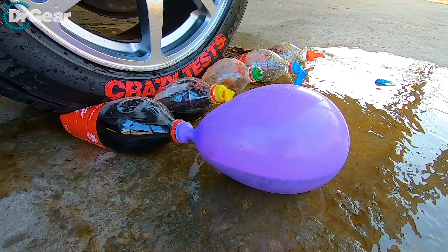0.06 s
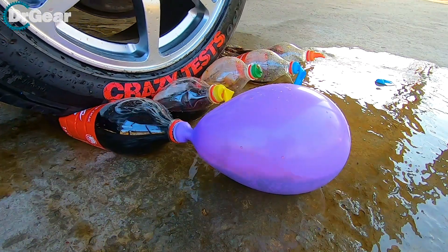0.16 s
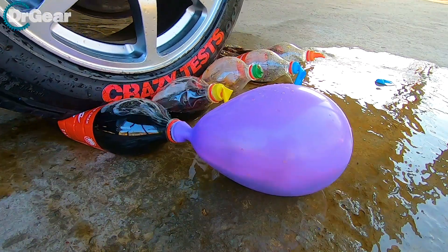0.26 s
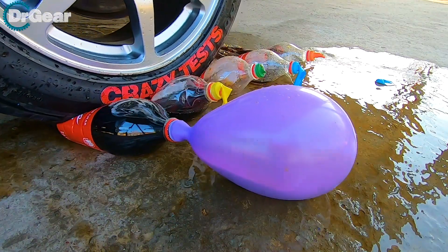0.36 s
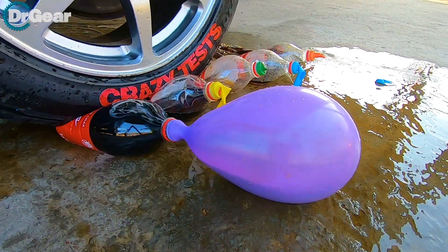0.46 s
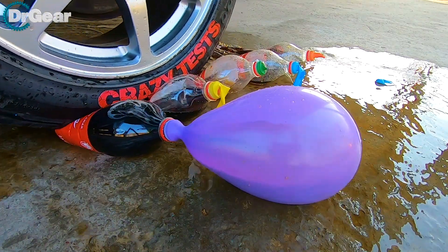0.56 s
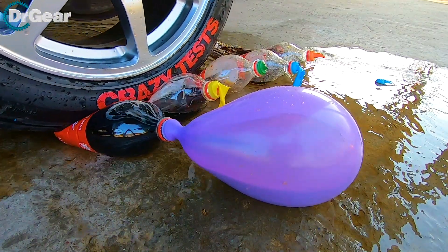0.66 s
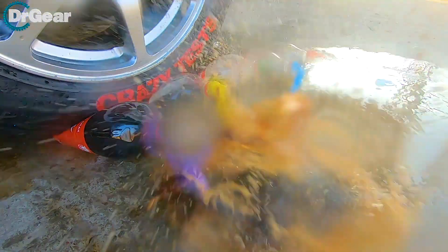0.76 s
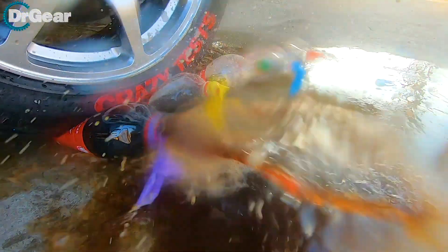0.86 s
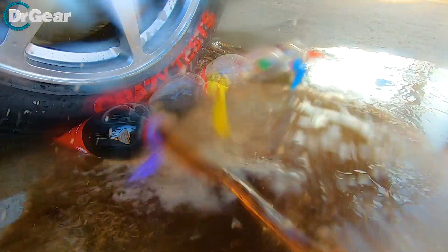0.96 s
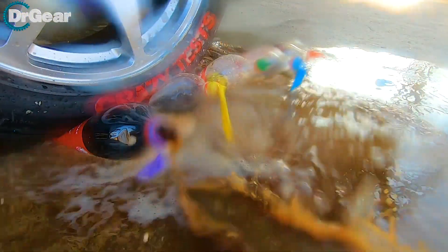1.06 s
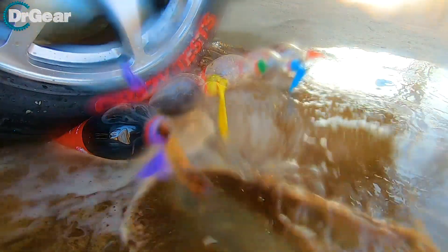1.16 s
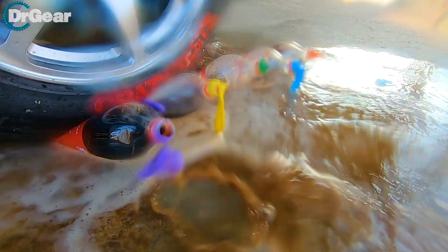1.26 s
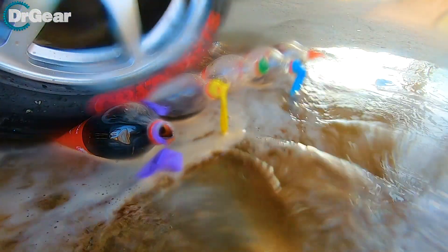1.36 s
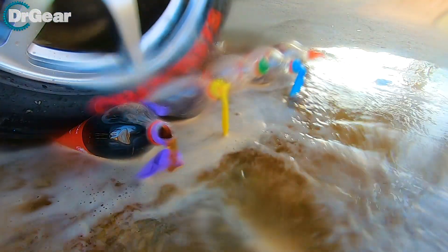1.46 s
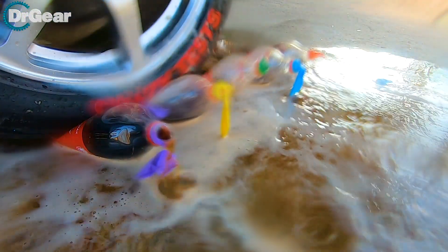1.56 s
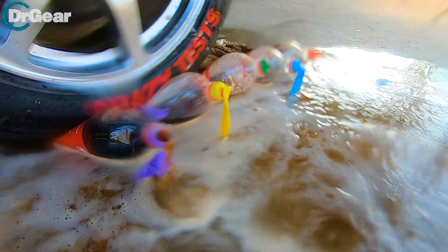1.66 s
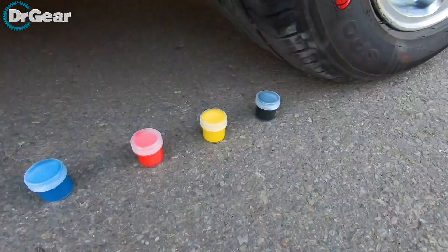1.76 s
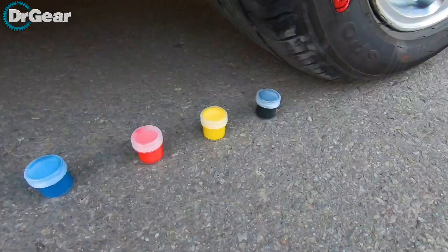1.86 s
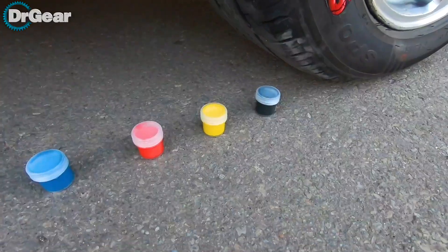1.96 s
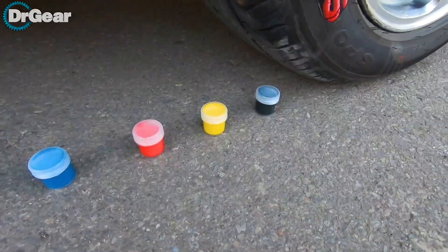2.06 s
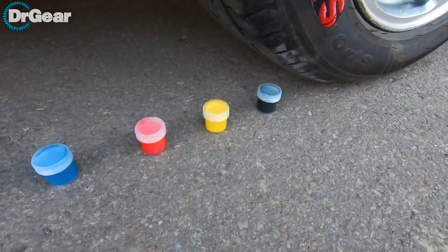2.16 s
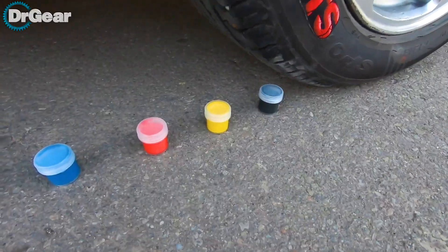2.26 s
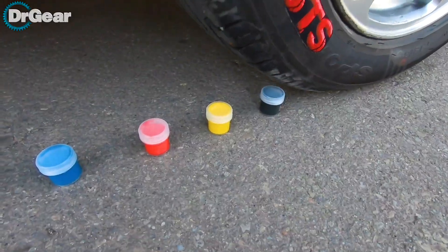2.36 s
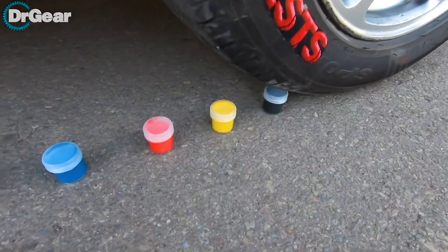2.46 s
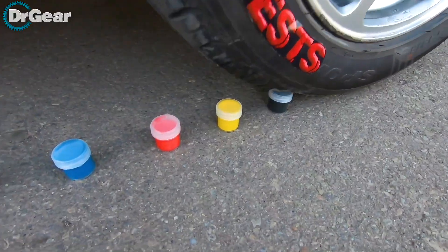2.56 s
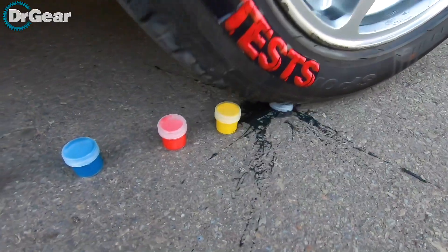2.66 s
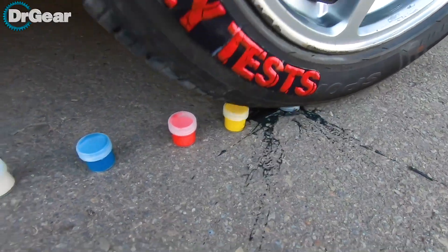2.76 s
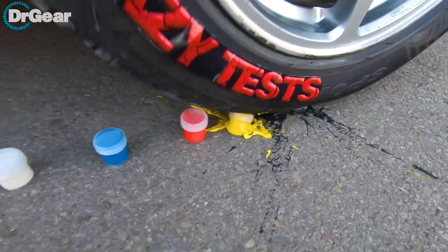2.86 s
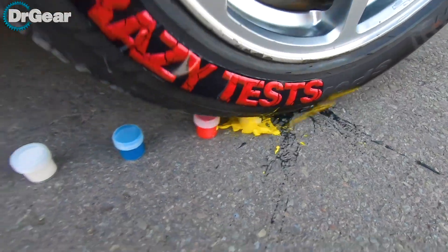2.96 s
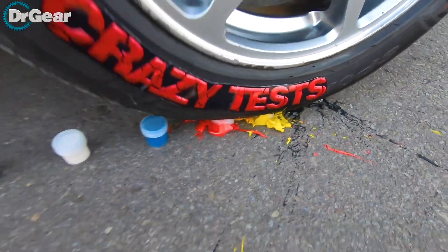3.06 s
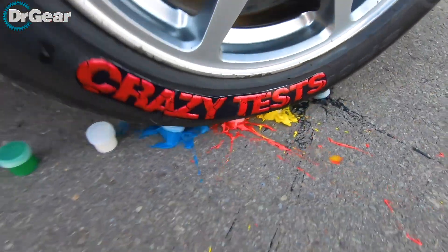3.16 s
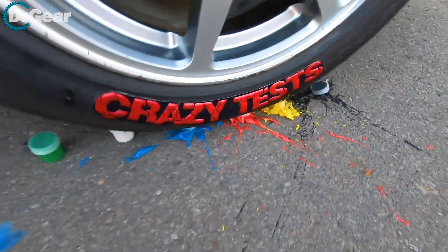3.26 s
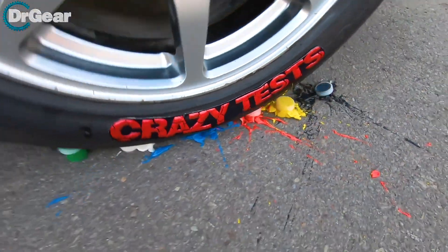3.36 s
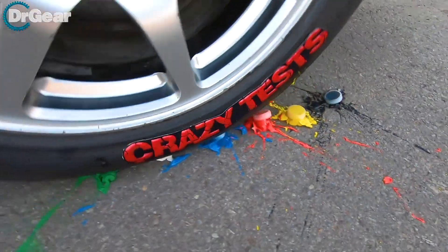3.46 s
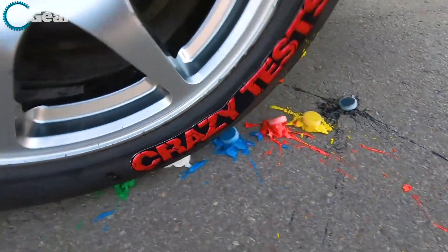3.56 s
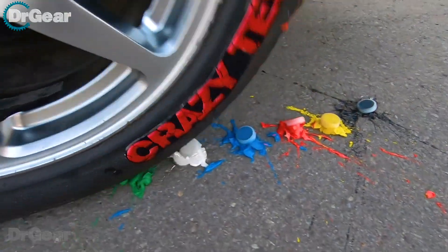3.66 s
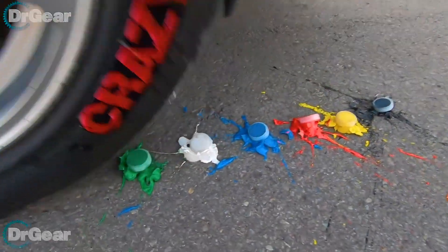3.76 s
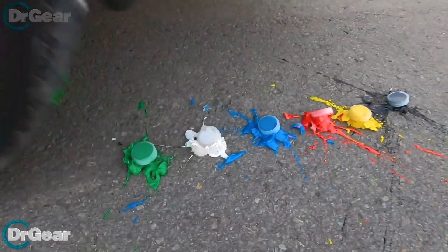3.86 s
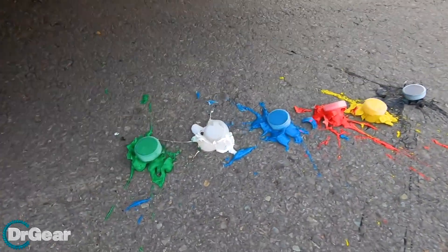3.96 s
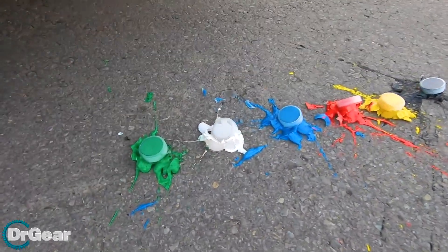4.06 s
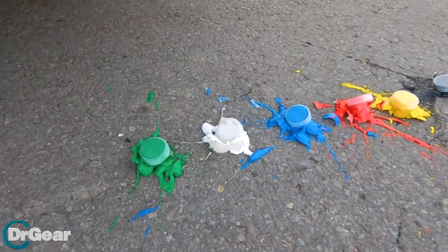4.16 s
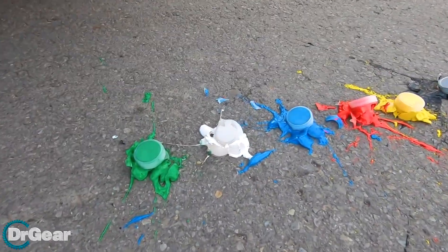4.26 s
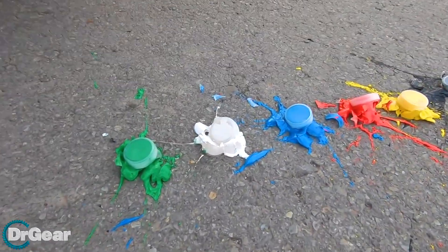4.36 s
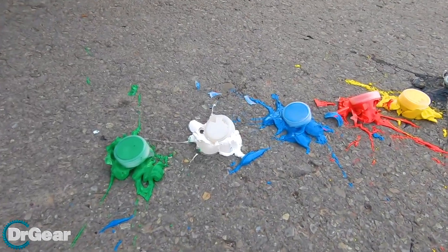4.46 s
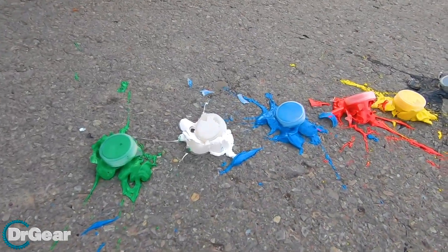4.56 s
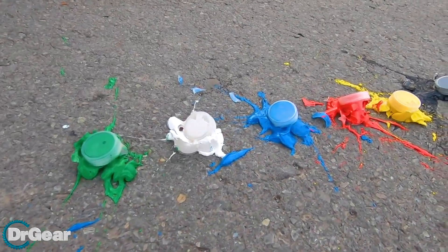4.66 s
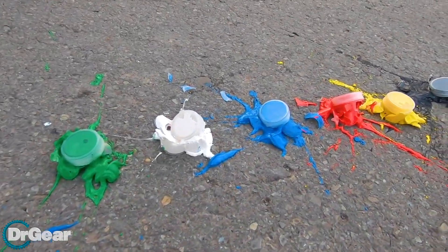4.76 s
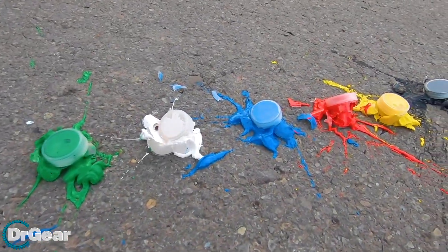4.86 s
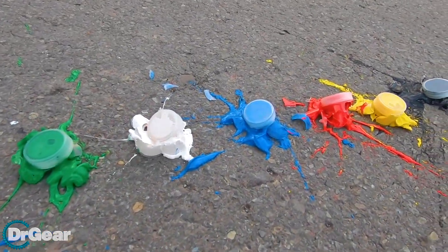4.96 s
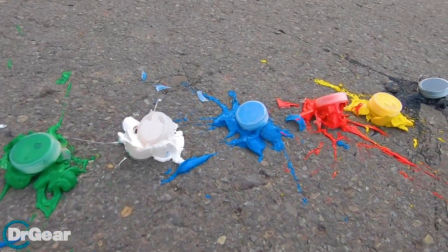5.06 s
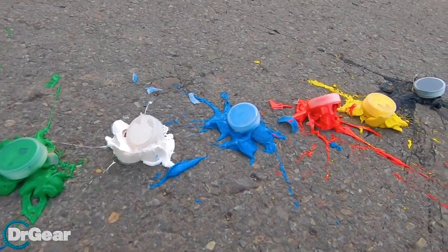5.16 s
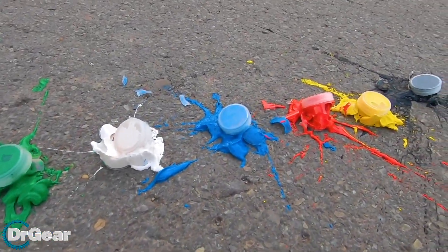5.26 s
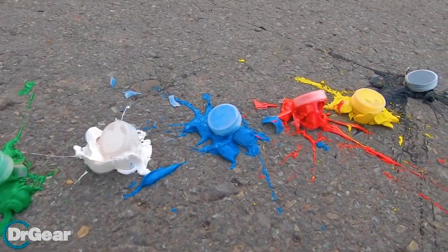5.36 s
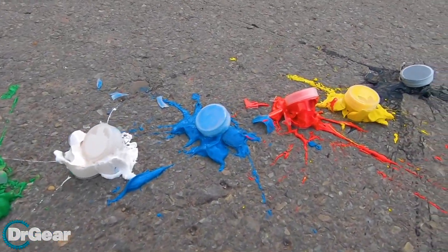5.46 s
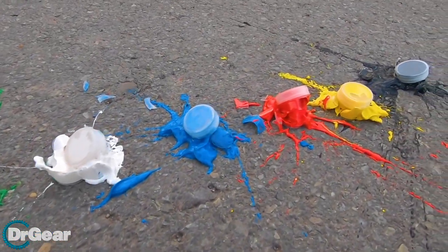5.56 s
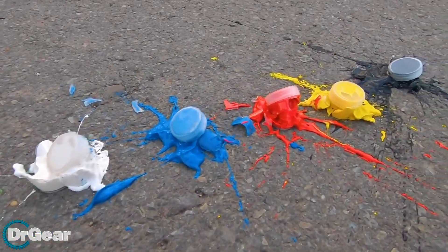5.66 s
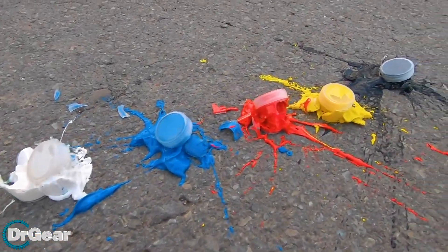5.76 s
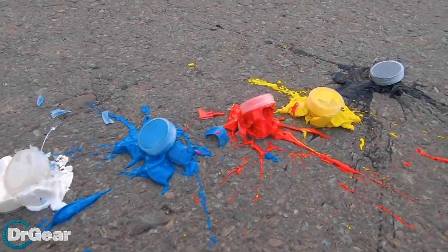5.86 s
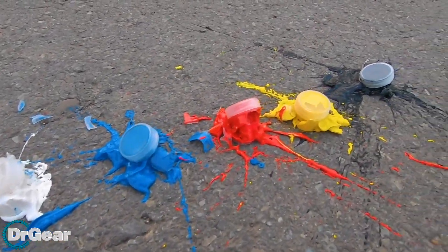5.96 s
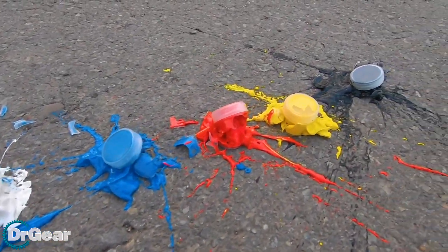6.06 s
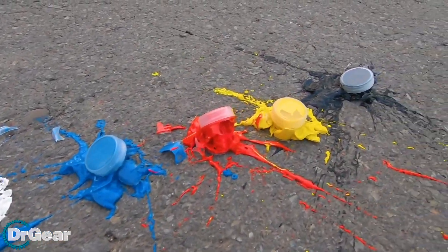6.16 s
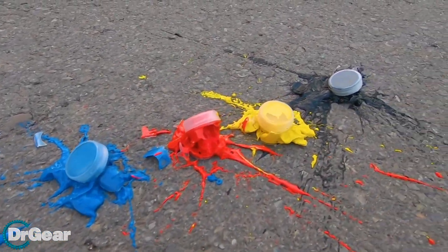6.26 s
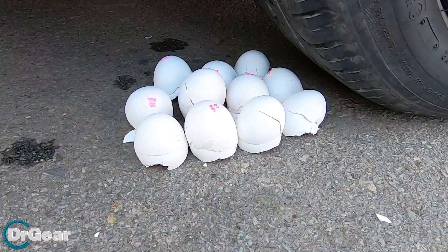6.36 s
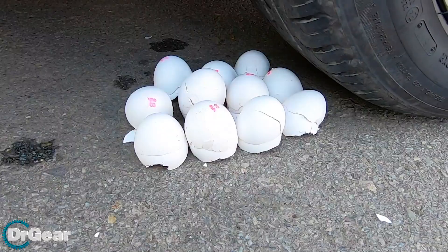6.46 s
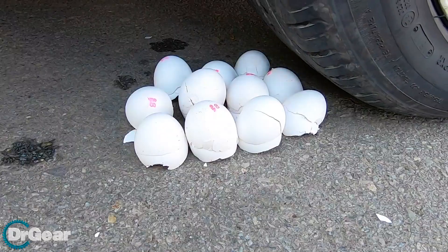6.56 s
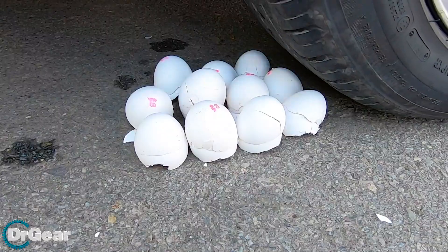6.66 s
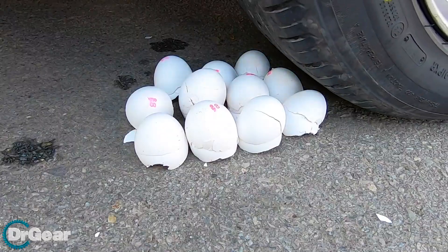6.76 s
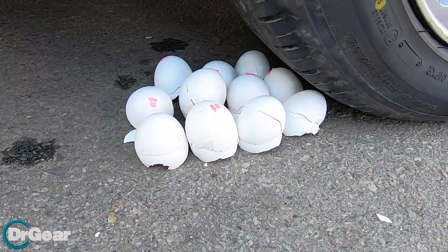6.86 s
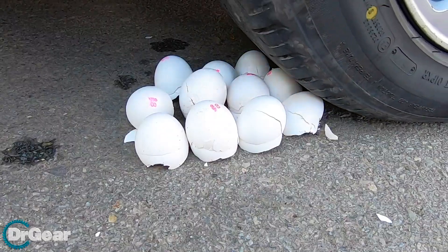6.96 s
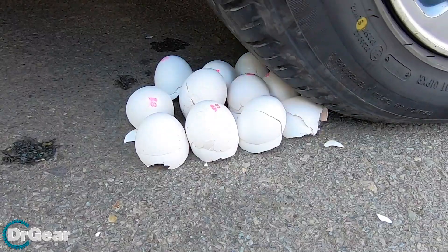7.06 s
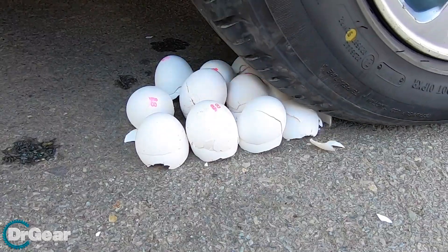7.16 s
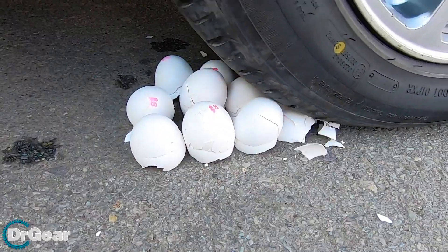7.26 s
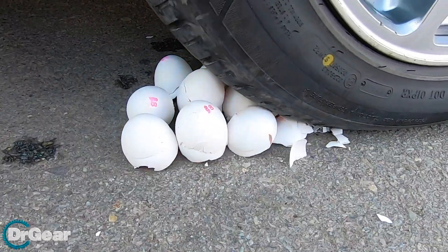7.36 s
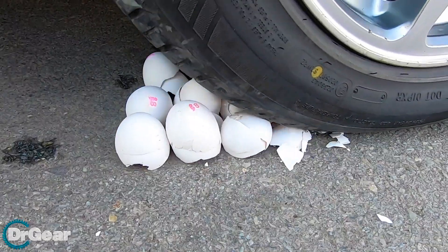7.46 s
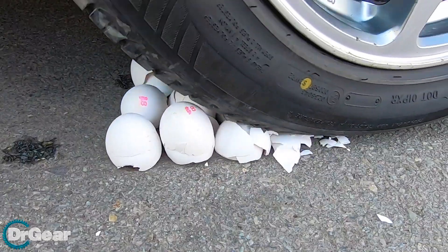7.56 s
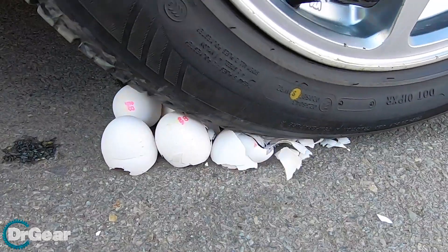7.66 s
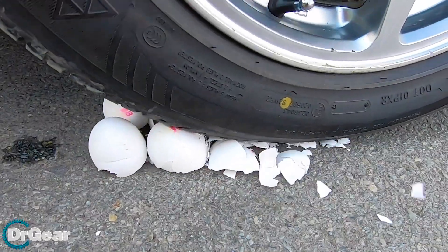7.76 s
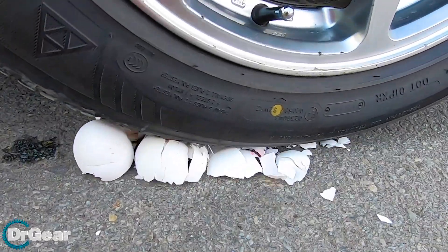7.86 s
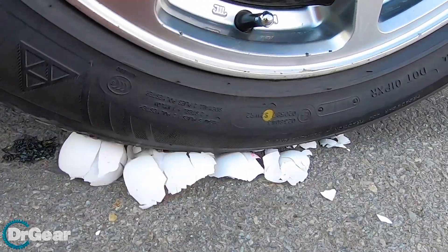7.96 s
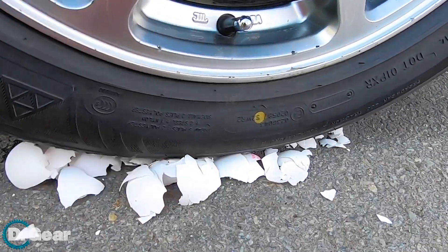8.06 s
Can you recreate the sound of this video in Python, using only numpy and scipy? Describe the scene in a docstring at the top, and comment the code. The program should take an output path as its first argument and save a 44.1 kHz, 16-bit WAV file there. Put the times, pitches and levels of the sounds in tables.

```python
"""A car creeps over things on asphalt, close by, its engine booming below. A plastic bottle buckles and
creaks, gas whistles into the balloon on its neck, and at 0.8 s the balloon bursts and sprays drink.
From 2.7 s paint tubs split and thump the tyre. From 3.8 s the car rolls off: rubber scuffs and squeaks,
grit pops under the tread. From 7 s empty eggshells crunch in a dense run of small fractures."""
import sys
import numpy as np
from scipy import signal
from scipy.fft import rfft, irfft
from scipy.io import wavfile
from scipy.ndimage import uniform_filter1d

SR = 44100
rng = np.random.default_rng(int(sys.argv[2]) if len(sys.argv) > 2 else 0)


def int16_out(signal):
    """Quantize to a 16-bit WAV file."""
    q = np.round(np.clip(np.atleast_2d(signal).T, -1, 1) * 32767)
    wavfile.write(sys.argv[1], SR, q.astype(np.int16))


N = 357651
TIME = np.arange(N) / SR
BURST_S = .7921


def bottle():
    """The wall buckles in steps: two rings, a crack and the hollow body, over a fine crackle."""
    # buckles: t/s, level/dB, low ring f/Hz, sharpness (high ring re low)/dB
    creaks = [(0.158, -28.5, 800, -17.5), (0.213, -23, 473, -12.5), (0.241, -34, 495, -8.5),
              (0.253, -21, 1300, -9.5), (0.267, -26.5, 492, -9), (0.2964, -21.5, 1450, 13.5),
              (0.308, -24, 507, 7), (0.315, -29, 600, 6), (0.334, -30.5, 624, 7.5), (0.341, -28, 1200, 0.5),
              (0.36, -19.5, 1000, -3), (.368, -31.5, 1100, 12), (0.3803, -19, 1000, -9),
              (.386, -27, 900, 7.5), (0.398, -17.5, 900, -9.5), (0.406, -12, 450, -7.5),
              (0.424, -12, 926, -10.5), (0.454, -11.5, 1110, -6), (0.472, -11, 470, -2),
              (0.487, -10, 1850, -2.5), (0.519, -24, 940, -3.5), (0.536, -24, 720, -4),
              (0.548, -26, 1420, 7), (0.577, -24.5, 1150, -7), (0.597, -40, 447, 15),
              (0.647, -17.5, 790, -22), (0.669, -27, 687, -24)]
    # crackle envelope: t/s, level/dB
    creep = [(.1, -76), (.21, -42.5), (.3, -43.5), (.44, -43.5), (.49, -27), (.57, -43), (.66, -51.5)]
    # crackle spectrum: f/Hz, density/dB
    wall = [(200, -3), (400, 0), (1200, -7), (2000, -1), (2900, -9), (4200, -7), (6500, -24.5),
            (9500, -14.5), (15000, -25)]
    wall_hz = 2883
    out = envelope(creep) * crackle(wall, rate_hz=190, scatter_db=2.7, side=.28, pole=.92)
    for s, db, low_hz, sharp_db in creaks:
        high_hz = wall_hz * (1 + .04 * rng.standard_normal())
        low = snap(low_hz, .69 * low_hz, .026) + .5 * ring(2 * low_hz, .005, length_s=.15)
        high = undb(sharp_db) * snap(high_hz, .28 * high_hz, .019)
        crack = undb(-17 + 3.3 * min(sharp_db, 2)) * snap(8000, 9000, .028)
        body = snap(280, 150, .057) + .65 * ring(250 + 15 * rng.standard_normal(), .07, length_s=.15)
        body_db = 10.5 - 41 * s  # stiffens and booms less as pressure builds
        add(out, s, low + high + crack + undb(body_db) * body, db, .83 * rng.standard_normal())
        for late, size, pitch in rng.random((4, 3)):
            slip = snap(wall_hz * (.93 + .14 * pitch), 300, .02, length_s=.03)
            add(out, s - .019 * np.log(late + .051), slip, db - 21 - 8 * size)
    return out


def balloon():
    """The skin tears: two swings of air, a crack, a ringing cavity; the wave sways the microphone."""
    # cavity modes: f/Hz, level/dB, t60/s
    modes = [(240, 6, 0.067), (338, -5, 0.1), (478, -4.5, 0.099), (610, -2.5, 0.11)]
    cavity_s = BURST_S + .0034
    out = np.zeros((2, N))
    add(out, BURST_S, -ring(680, .016), 6)
    add(out, BURST_S + .00287, 1.3 * ring(800, .0098) - ring(330, .0065), -1)
    add(out, cavity_s, snap(900, 700, .081), -8)
    add(out, cavity_s, sum(undb(db) * ring(hz, t60_s) for hz, db, t60_s in modes), -9)
    add(out, BURST_S + .0026, snap(9000, 7000, .015), -4, pan_db=-9)  # crack of the skin
    add(out, BURST_S + .002, snap(3200, 2500, .0084), -9)
    add(out, BURST_S, snap(2200, 3000, .12), -24)
    sway = -ring(11, .4, length_s=.73)[int(.014 * SR):]
    add(out, BURST_S, sway, -4)
    return out


def tubs():
    """Each tub splits with a ring, a crack, a hollow pop and a spit of paint; the tyre drops and rings."""
    # splits: t/s, level/dB, ring f/Hz, relative crack/dB, relative thump/dB
    splits = [(2.734, -4, 700, -5, -12), (2.9465, -12.5, 2650, 8, -5), (2.979, -45, 5600, 5, -1),
              (2.9875, -39, 5600, 5.5, 6.5), (3.0102, -27, 3600, 6.5, -5), (3.0208, -23, 1630, -1, -2),
              (3.0362, -26, 1920, -1.5, -1), (3.0558, -15, 3360, 8, -6), (3.1045, -10, 5100, 5, -5),
              (3.1604, -14.5, 2540, 0, -22), (3.1938, -13.5, 2600, 6, -5.5), (3.2729, -15.5, 2320, 5.5, 3),
              (3.311, -15.5, 2250, 5, -6.5), (3.4023, -15.5, 2470, 3, -1.5), (3.4133, -23, 1544, -4, 0),
              (3.4203, -17, 4030, 1, -14), (3.4383, -16.5, 2140, 2, -20), (3.441, -15.5, 1470, 4.5, -5),
              (3.4522, -19.5, 1700, 4, -8), (3.475, -25.5, 2330, 2, -9), (3.512, -16.5, 1770, 5.5, 0),
              (3.5214, -22, 3200, -4, 2), (3.5305, -20, 2420, 0, -3), (3.5583, -9.5, 4030, -2, -6)]
    # tyre modes: f/Hz, level/dB, t60/s
    tyre_modes = [(110, -9, 0.11), (168.1, -4, 0.12), (228, 2, 0.065), (340, -4, 0.057)]
    out = np.zeros((2, N))
    for s, db, hz, crack_db, thump_db in splits:
        wall = snap(hz, .53 * hz, .0082)
        crack = 1.02 * snap(8500 + 116 * db, 9000, .011) - .34 * click(hz, .0018)  # weaker is duller
        pop = undb(-3 + .61 * thump_db) * snap(760, 809, .027)
        spit = .09 * snap(3000, 3800, .05) + .06 * snap(9500, 6000, .055)
        pan_db = 5.5 * (s - 3.6)  # the tyre rolls from right to centre
        add(out, s, wall + pop + undb(crack_db) * (crack + spit), db, pan_db)
        thump = 0
        for mode_hz, mode_db, t60_s in tyre_modes:
            gain = undb(mode_db + 2 * rng.standard_normal())
            thump += gain * ring(mode_hz * (1 + .06 * rng.standard_normal()), t60_s)
        add(out, s + .0019, thump, db + thump_db, pan_db=-1.5)
        for late, size, pitch in rng.random((5, 3)):
            fleck = snap(1500 * 6 ** pitch, 4000, .0061, length_s=.03)
            add(out, s + .016 * (.5 + late), fleck, db - 26.5 + 6 * size, pan_db=-3)
    return out


def eggshells():
    """Thin shells fracture in swells; each larger crack sheds shards that ring near its pitch."""
    # larger cracks: t/s, level/dB, ring f/Hz
    cracks = [(7.041, -27, 2730), (7.055, -13.5, 1850), (7.075, -15, 1600), (7.091, -21.5, 735),
              (7.092, -13, 1610), (7.099, -11, 1770), (7.104, -16, 1630), (7.109, -15, 1550),
              (7.149, -16.5, 2940), (7.185, -9.5, 1410), (7.221, -14, 1490), (7.237, -12.5, 1440),
              (7.247, -16, 1170), (7.264, -10, 3040), (7.285, -9, 2980), (7.2892, -12, 1690),
              (7.299, -18, 1450), (7.354, -25, 2520), (7.404, -19, 1750), (7.426, -16, 3000),
              (7.475, -12, 3075), (7.49, -20, 3330), (7.501, -18, 2870), (7.511, -15, 1560),
              (7.522, -17, 1210), (7.532, -13, 1480), (7.539, -13.5, 2700), (7.547, -23, 2000),
              (7.574, -13, 2950), (7.6, -13, 680), (7.621, -22, 1500), (7.628, -12.5, 2200),
              (7.692, -21, 1300), (7.712, -23, 1300), (7.725, -19, 1240), (7.741, -16, 1290),
              (7.758, -19, 1440), (7.774, -11, 5750), (7.785, -17, 4300), (7.807, -23, 1830),
              (7.828, -21, 2320), (7.851, -19, 1340), (7.876, -14, 2930), (7.897, -18, 2980),
              (7.915, -15, 2800), (7.956, -14, 820), (7.992, -17, 1990), (8.002, -17, 2800),
              (8.034, -14.5, 1770), (8.074, -13, 1385)]
    # crackle envelope: t/s, level/dB
    crunch = [(7.04, -48), (7.06, -33.5), (7.1, -26.5), (7.15, -31.5), (7.28, -29.5), (7.34, -33),
              (7.46, -25.5), (7.49, -24.5), (7.545, -27), (7.565, -28), (7.69, -29), (7.76, -25),
              (8.11, -26)]
    # crackle spectrum: f/Hz, density/dB
    spectrum = [(180, -31), (300, -12), (405, -50), (634, -7), (814, -6.5), (2610, -6), (3640, -10.5),
                (5700, -9.5), (8360, -18.5), (9880, -11), (13000, -24.5), (16500, -15)]
    onset_s, shards_s, end_s = crunch[0][0], crunch[1][0], TIME[-1]
    crunch_db = curves(crunch)[0] + 1.1 * walk(25)
    fractures = crackle(spectrum, rate_hz=400, scatter_db=2.8, side=.37, pole=.94)
    out = (TIME > onset_s) * undb(crunch_db) * fractures
    for s, db, hz in cracks:
        shell = snap(hz, .38 * hz, .012) + .38 * click(hz, .0053)
        edge = .55 * snap(5100, 5210, .019) + .19 * snap(9500, 2000, .015)
        add(out, s, shell + edge, db, 2 * rng.standard_normal())
        for late, size, pitch in rng.random((5, 3)):
            shard_hz = hz * (.8 + .4 * pitch)
            shard = snap(shard_hz, .16 * shard_hz, .02, length_s=.04)
            add(out, np.clip(s + .022 * (2 * late - .6), shards_s, end_s), shard, db - 10.5 - 9 * size)
    for when, size, pitch, place in rng.random((220, 4)):
        s = shards_s + when * (end_s - shards_s)
        splinter_db = np.interp(s, TIME, crunch_db) + 9.5 - 3.5 * np.log(size + .06)
        add(out, s, click(1300 * 4.5 ** pitch, .0022), splinter_db, 6 * (place - .5))
    return out


def spray():
    """Spilt drink fizzes; drops land as broad splats."""
    # fizz envelope: t/s, level/dB
    fizz = [(.9, -71), (1.1, -67), (1.5, -63.5), (1.72, -59), (1.95, -66)]
    # splats: t/s, level/dB, centre f/Hz, t60/s
    drops = [(0.808, -23, 4770, 0.024), (0.824, -29, 2200, 0.02), (0.8524, -14, 2670, 0.0026),
             (0.851, -26, 1710, 0.14), (0.852, -19, 900, 0.0068), (0.96, -43, 1142, 0.051),
             (.975, -43.5, 1500, 0.046), (.989, -48, 2490, 0.027), (1.07, -54, 5000, 0.11),
             (1.125, -47, 2920, 0.061), (1.488, -45.5, 3984, 0.4)]
    out = envelope(fizz) * undb(1.4 * walk(34.6))
    out = out * colour(wide(.077), [(2500, -2), (5000, -3.5), (10000, -4), (15500, -3)])
    for s, db, hz, t60_s in drops:
        add(out, s, snap(hz, .79 * hz, t60_s, length_s=.3), db, 2.7 * rng.standard_normal())
    return out


def gas_leak():
    """Gas whistles into the balloon: a narrow, falling band of noise."""
    # whistle: t/s, level/dB, f/Hz
    leak = [(.64, -44.5, 3300), (.69, -46.5, 3170), (.76, -46, 2870), (.785, -56, 2800)]
    _, hz = curves(leak)
    return envelope(leak) * smooth_noise(N, 50) * np.sin(2 * np.pi * np.cumsum(hz) / SR)


def grit():
    """Small things tick and grains pop under the rolling tread."""
    # ringing ticks: t/s, level/dB, f/Hz, t60/s
    ticks = [(1.195, -30.5, 840, 0.045), (1.209, -36.5, 548, 0.29), (1.698, -39, 3300, 0.026),
             (1.736, -36, 3200, 0.015), (1.758, -41, 3300, .02), (1.78, -24.5, 3460, 0.016),
             (1.784, -35, 4250, 0.013), (1.792, -34, 3400, 0.025), (2.714, -28.5, 775, 0.079),
             (2.721, -21.5, 905, 0.018), (3.639, -33.5, 8700, 0.021), (3.639, -33, 2520, 0.032),
             (3.811, -37, 9370, 0.033), (4.527, -46, 2920, 0.017), (4.56, -57, 9500, 0.095),
             (4.612, -51, 10090, 0.038), (4.725, -46.5, 9840, 0.061), (4.883, -41, 10400, 0.072)]
    # clearest grains: t/s
    pops_s = [4.296, 4.612, 4.725, 4.77, 4.885, 4.9, 5.075, 5.223, 5.25]
    out = np.zeros((2, N))
    for s, db, hz, t60_s in ticks:
        add(out, s, snap(hz, 340 + .17 * hz, t60_s, length_s=.3), db, 2.7 * rng.standard_normal())
    for when, size, pitch in rng.random((400, 3)):
        grain = snap(1700 * 2.2 ** pitch, 1800, .012, length_s=.02)
        add(out, 3.6 + 2.6 * when, grain, -69 - 5.5 * np.log(size + .075) - 7 * when)
    for s in pops_s:
        add(out, s, snap(2500, 2600, .018, length_s=.02), -52 + 2 * rng.standard_normal())
    return out


def rubber():
    """The tyre scuffs and squeaks thinly as the car pulls away."""
    # scuff envelope: t/s, level/dB
    scuff = [(3.78, -62), (3.84, -49.5), (4.18, -51), (4.23, -68)]
    # squeaks: t/s, length/s, level/dB, f/Hz
    squeaks = [(4.12, 0.054, -59, 1500), (4.3, 0.054, -62, 1360), (4.875, .04, -61, 1370),
               (5.054, .085, -58.5, 1366), (5.109, .045, -70, 4270), (5.427, .04, -73, 3950)]
    spectrum = [(550, -14.5), (750, 3), (1100, 4), (1250, -16.5), (1500, -11.5), (1700, -29.5)]
    out = envelope(scuff) * undb(5 * walk(30)) * colour(wide(.4), spectrum)
    for s, length_s, db, hz in squeaks:
        t = np.arange(int(length_s * SR)) / SR
        phase = 2 * np.pi * hz * np.cumsum(1 + .03 * smooth_noise(len(t), 150)) / SR
        add(out, s, np.sqrt(np.sin(np.pi * t / length_s)) * np.sin(phase), db)
    return out


def knocks():
    """Two dull knocks on the microphone's housing."""
    # knocks: t/s, level/dB, f/Hz, t60/s
    thuds = [(5.807, -25.5, 75, 0.13), (6.359, -35, 16, 0.45)]
    out = np.zeros((2, N))
    for s, db, hz, t60_s in thuds:
        add(out, s, ring(hz, t60_s, length_s=.6), db)
    return out


def engine():
    """A wavering firing tone; its overtones boom where they pass the exhaust resonance."""
    # one table per stretch: t/s, firing f/Hz, tone/dB, boom/dB
    stretches = [
        [(0, 50.6, -39, -42.5), (.2, 44.93, -43, -34.5), (.7, 30, -31.5, -64), (1.01, 22.46, -40, -76),
         (1.2, 24.57, -39, -61.5), (1.44, 26.78, -36.5, -47.5), (1.8, 26.96, -34.5, -39),
         (1.97, 27.05, -54, -51)],
        [(1.7, 56.8, -51, -57), (1.73, 57.3, -50, -31.5), (1.83, 58.46, -37, -22.5), (1.9, 60.6, -30.5, -26),
         (2.15, 60.36, -31, -30), (2.47, 56.03, -28, -19.5), (2.72, 49.94, -30, -25.5), (2.76, 49.2, -49, -45)],
        [(2.76, 47.7, -45, -43.5), (3.11, 42.63, -56, -29), (3.81, 38.3, -45.5, -26), (4.0, 39.24, -43, -24.5),
         (4.17, 42.54, -38.5, -25), (4.26, 43.55, -36.5, -39.5), (4.36, 42.5, -34, -33),
         (4.45, 41.95, -35.5, -38.5), (4.52, 40.9, -36, -31.5), (4.63, 40.67, -37, -32),
         (4.9, 35.5, -35, -39.5), (4.96, 35.26, -36, -39.5), (5.2, 31.54, -33, -50.5), (5.74, 26, -43.5, -47),
         (6.3, 27.2, -39.5, -45)],
        [(6.3, 26.94, -33, -42), (6.42, 28.2, -38.5, -34), (6.52, 28.7, -36, -29), (7.14, 32.7, -34, -31.5),
         (7.4, 34.77, -38, -38.5), (8.11, 34.62, -35.5, -41)],
    ]
    # one row per stretch: weight/dB of multiples 2 to 8 of the firing rate
    overtones = [
        [-1.5, -4, -5.5, 3, -6, -3, -10.5],
        [-39.5, 4.5, -25, -13, -17.5, -28, -30],
        [-0.5, -8, 2, -9.5, -10, -5.5, -20],
        [1, 7, -1.5, 1.5, -5.5, -15, -20.5],
    ]
    # boom per stretch: left minus right/dB
    pans_db = [0, -0.53, -.25, -1.4]
    exhaust_hz, exhaust_width_hz = 154, 23
    out = np.zeros((2, N))
    for table, weights_db, pan_db in zip(stretches, overtones, pans_db):
        hz, tone_db, boom_db = curves(table)
        phase = 2 * np.pi * np.cumsum(hz * (1 + .007 * walk(14) + .006 * walk(25))) / SR
        boom, power = 0, 0
        for k, db in enumerate(weights_db, start=2):
            resonance = .15 + 1 / (1 + ((k * hz - exhaust_hz) * 2 / exhaust_width_hz) ** 2)
            gain = resonance * undb(db + 2.2 * walk(8) + .5 * k * walk(30))  # higher ones flutter more
            boom += gain * np.sin(k * phase + rng.uniform(0, 2 * np.pi))
            power += gain ** 2
        boom *= undb(boom_db + 1.7 * walk(22)) / np.sqrt(power)
        out += np.sqrt(2) * during(table) * (undb(tone_db) * np.sin(phase) + pan(pan_db) * boom)
    return out


def tyre_hum():
    """The air in the loaded tyre hums at its cavity resonance."""
    # one envelope per hum: t/s, level/dB
    hums = [
        [(2.74, -35), (2.81, -31), (2.96, -32)],
        [(7.14, -75), (7.22, -34.5), (7.7, -56.5), (8.11, -47)],
    ]
    cavity_hz = 231
    level = sum(envelope(table) * undb(3.1 * walk(28)) for table in hums)
    return np.sqrt(2) * level * np.sin(2 * np.pi * cavity_hz * TIME)


def road_roar():
    """Engine bay and road roar over a low rumble; both flicker a little."""
    # one envelope per stretch: t/s, level/dB
    stretches = [
        [(0, -47.5), (.12, -47), (.3, -38.5), (.5, -41.5), (.75, -46.5), (1.05, -64.5), (1.72, -54.5)],
        [(1.72, -54), (1.79, -46.5), (1.87, -36), (2.0, -33.5), (2.4, -33.5), (2.75, -41.5)],
        [(2.75, -53.5), (3.1, -48), (3.5, -44.5), (3.72, -55.5), (6.27, -62)],
        [(6.27, -54.5), (6.33, -50), (6.4, -42), (7.03, -43.5)],
    ]
    # one roar spectrum per stretch: f/Hz, density/dB
    spectra = [
        [(260, -33), (450, -3.5), (523, -4), (1090, -9), (1360, -7), (1630, -15), (7360, -33), (16000, -32.5)],
        [(260, -43), (450, -12), (644, -4), (1220, -10), (2870, -21.5), (6630, -45.5), (9630, -39.5),
         (13600, -54), (16000, -93)],
        [(260, -32.5), (450, 2.5), (1180, -4.5), (1380, -6), (1530, -7), (3500, -16), (5500, -26), (7500, -30),
         (10500, -22), (14000, -44.5)],
        [(260, -55), (450, -17), (568, -16), (652, -3), (882, -13.5), (1150, -10.5), (1570, -30.5), (2010, -20),
         (7320, -36.5), (12000, -57), (15600, -96.5), (22000, -120)],
    ]
    # per stretch: rumble re roar/dB
    rumbles_db = [-0.5, -5, 8, -5.5]
    dip_s, hold_s, return_s = 2.75, .046, .14  # the roar dips after the first tub
    dip_db = -18.5 * (TIME > dip_s) * np.clip(1 - (TIME - dip_s - hold_s) / return_s, 0, 1)
    rumble = colour(wide(.12), [(12, -4), (40, -5.5), (120, 5), (300, 1), (480, -17.5)])
    out = np.zeros((2, N))
    for table, spectrum, rumble_db in zip(stretches, spectra, rumbles_db):
        if table is stretches[-1]:  # holds to the end
            table = [*table, (N / SR + 1, table[-1][1])]
        low = undb(rumble_db + 2 * walk(17)) * rumble
        roar = undb(dip_db + 1.8 * walk(40)) * colour(wide(.68), spectrum)
        out += envelope(table) * (low + roar)
    return out


def crackle(spectrum, rate_hz, scatter_db, side, pole):
    """Surging fractures: broad ticks over a hiss of dust; each size of piece rings in its own band."""
    chance = undb(2 * walk(60)) * rate_hz / SR
    ticks, *pieces = (
        (rng.random(N) < chance) * undb(scatter_db * np.minimum(rng.exponential(size=N), 3.5))
        for _ in range(11))
    out = 0
    for hz, piece in zip(500 * 2. ** np.arange(0, 5, .5), pieces):
        grains = signal.lfilter([1], [1, -pole], piece + .5 * ticks + .015) * wide(side)
        out += unit(signal.lfilter(*signal.iirpeak(hz, 3, SR), grains)) * np.sqrt(hz)
    return colour(out, spectrum)


def snap(hz, width_hz, t60_s, length_s=.15):
    """A noise burst through a steep resonance, mid peak 1; wider in stereo the higher it is."""
    t = np.arange(int(length_s * SR)) / SR
    b, a = signal.iirpeak(hz, hz / min(width_hz, 1.8 * hz), SR)
    burst = wide(.13 + hz / 20000, len(t)) * 1000. ** (-t / t60_s) * (1 - np.exp(-t / .00013))
    x = signal.lfilter(b, a, signal.lfilter(b, a, burst))
    return x / np.abs(x.mean(axis=0)).max()


def ring(hz, t60_s, length_s=.3):
    """A struck mode."""
    t = np.arange(int(length_s * SR)) / SR
    return np.sin(2 * np.pi * hz * t) * 1000. ** (-t / t60_s)


def click(hz, t60_s):
    """A bare fracture: one heavily damped mode, peak 1."""
    x = ring(hz, t60_s, length_s=.15)
    return x / np.abs(x).max()


def wide(side, n=N):
    """Stereo noise, alike left and right but for a side share."""
    mid, difference = rng.standard_normal((2, n))
    return mid + side * difference * np.array([[1], [-1]])


def colour(x, spectrum):
    """Filter x by (f/Hz, gain/dB) points; rms 1."""
    hz, db = np.transpose(spectrum)
    log_hz = np.log(np.arange(N // 2 + 1) * SR / N + 1)
    gain = undb(np.interp(log_hz, np.log(hz), db, left=-90, right=-90))
    return unit(irfft(rfft(x) * gain, N))


def smooth_noise(n, span):
    """Noise averaged over span samples; rms 1."""
    return unit(uniform_filter1d(rng.standard_normal(n), span))


def walk(rate_hz):
    """Random held levels, slewed twice; spread near 1."""
    hold = int(SR / rate_hz)
    steps = np.repeat(rng.standard_normal(N // hold + 1), hold)
    return 1.3 * uniform_filter1d(uniform_filter1d(steps, hold), hold)[:N]


def curves(table):
    """Columns of a table along time."""
    s, *columns = np.transpose(table)
    return [np.interp(TIME, s, column) for column in columns]


def during(table):
    """1 from the first row to the last, with 20 ms fades."""
    return np.clip(np.minimum(TIME - table[0][0], table[-1][0] - TIME) / .02 + .5, 0, 1)


def envelope(table):
    """Gated amplitude from (t/s, level/dB) rows."""
    return during(table) * undb(curves(table)[0])


def undb(db):
    return 10 ** (np.asarray(db) / 20)


def unit(x):
    return x / np.sqrt(np.mean(x ** 2))


def pan(db):
    """Stereo gains, left over right by db."""
    return undb([[db / 2], [-db / 2]])


def add(out, s, x, db, pan_db=0.):
    i = int(s * SR)
    out[:, i:i + x.shape[-1]] += undb(db) * pan(pan_db) * x[..., :N - i]


def scene():
    """Ground and car body scatter the hits into a short tail; engine, hum and roar lie below."""
    hits = bottle() + balloon() + tubs() + eggshells()
    hits += spray() + gas_leak() + grit() + rubber() + knocks()
    t = np.arange(6000) / SR
    tail = rng.standard_normal((2, len(t))) * 1000. ** (-t / .14)
    tail = signal.lfilter(*signal.butter(1, 700, "high", fs=SR), tail)
    scattered = undb(-47.5) * signal.fftconvolve(hits, tail, axes=1)[:, :N]
    out = hits + scattered + engine() + tyre_hum() + road_roar()
    # nearly mono until 1.66 s, but for the crack of the tearing skin
    width = np.clip(.04 + (TIME - 1.66) / .05, .04, 1)
    width[(TIME > BURST_S) & (TIME < BURST_S + .015)] = 1
    mid = out.mean(axis=0)
    return mid + width * (out - mid)


def record(dry):
    """The microphone port dulls all above its resonance; peaks are rounded and the top is cut."""
    port_hz, port_q, top_hz = 10850, .78, 16300
    w = 2 * np.pi * port_hz
    port = signal.lfilter(*signal.bilinear([w * w], [1, w / port_q, w * w], SR), dry)
    rounded = np.tanh(1.036 * port) / 1.035
    return signal.sosfilt(signal.ellip(8, .2, 80, top_hz, fs=SR, output="sos"), rounded)


dry = scene()
out = record(dry)
int16_out(out)
```